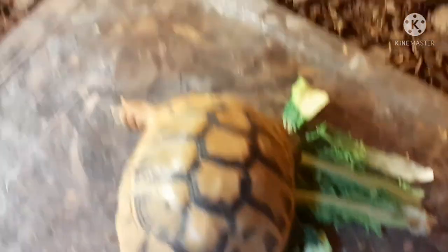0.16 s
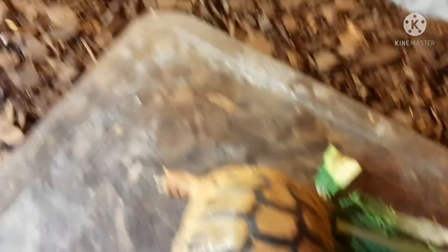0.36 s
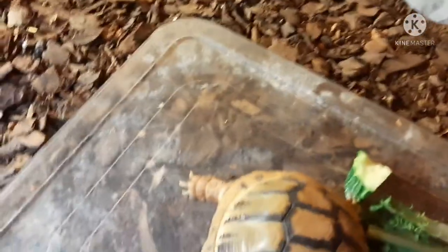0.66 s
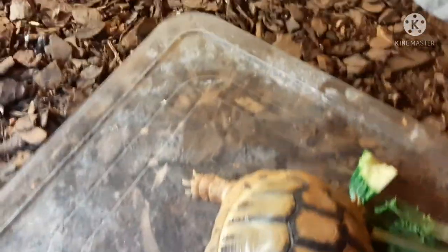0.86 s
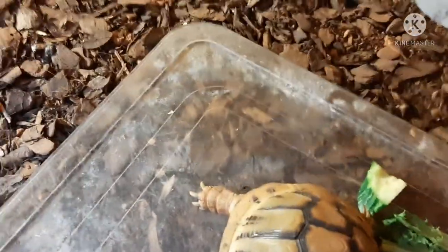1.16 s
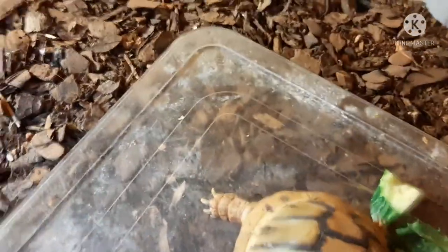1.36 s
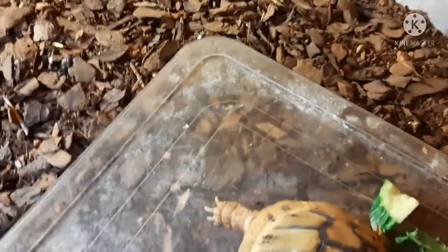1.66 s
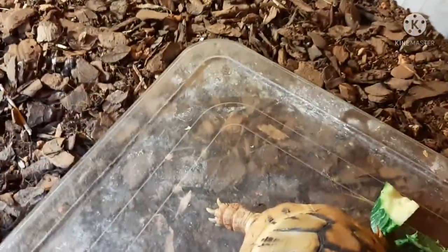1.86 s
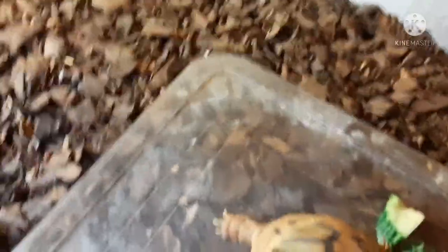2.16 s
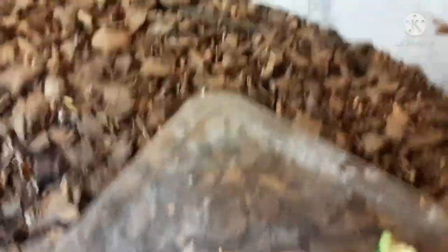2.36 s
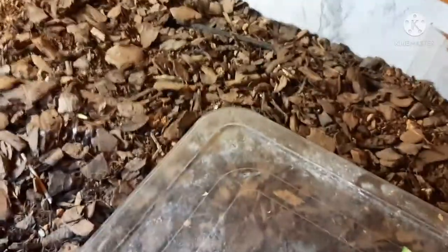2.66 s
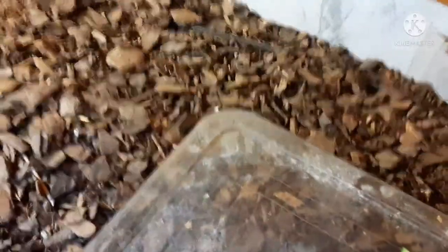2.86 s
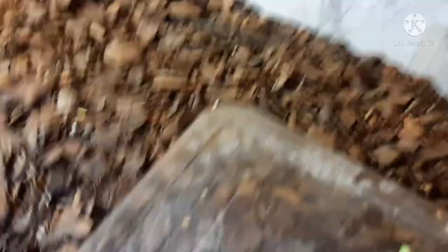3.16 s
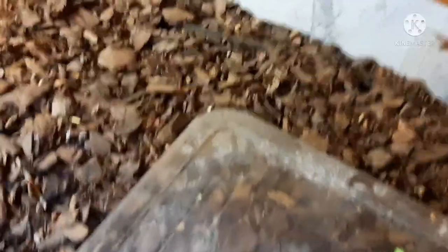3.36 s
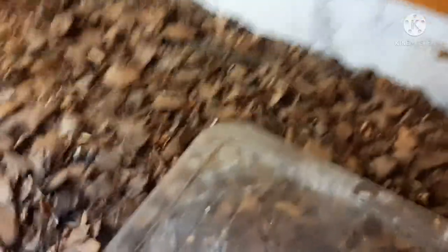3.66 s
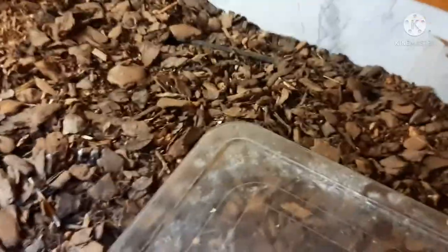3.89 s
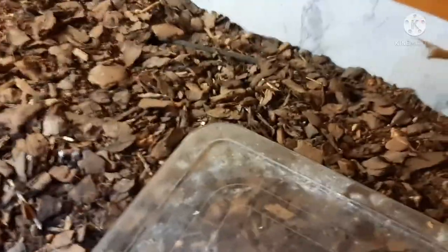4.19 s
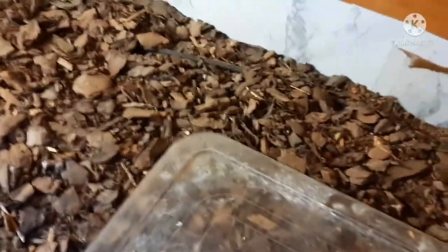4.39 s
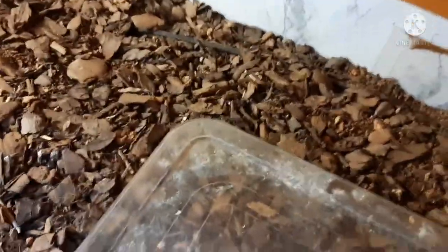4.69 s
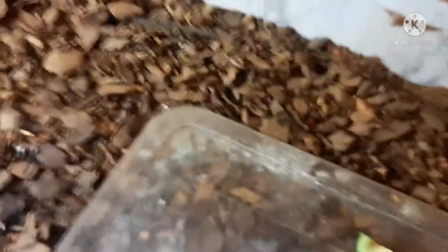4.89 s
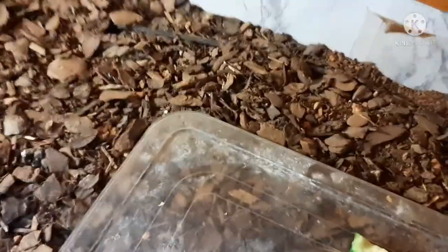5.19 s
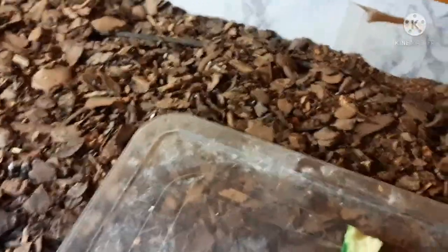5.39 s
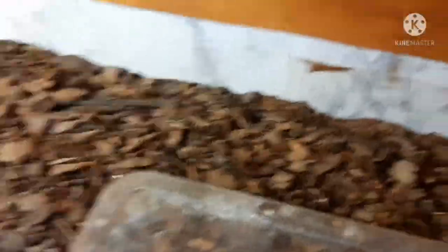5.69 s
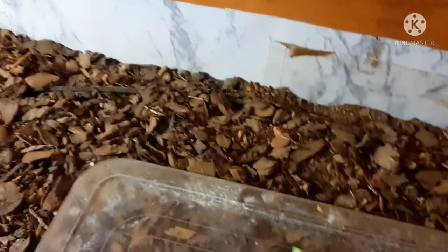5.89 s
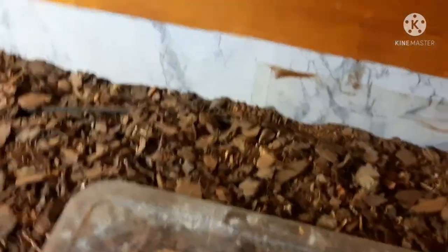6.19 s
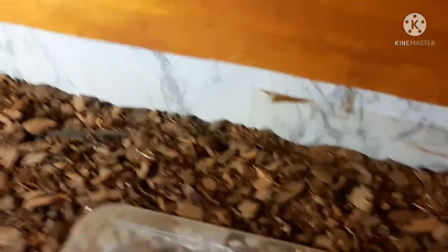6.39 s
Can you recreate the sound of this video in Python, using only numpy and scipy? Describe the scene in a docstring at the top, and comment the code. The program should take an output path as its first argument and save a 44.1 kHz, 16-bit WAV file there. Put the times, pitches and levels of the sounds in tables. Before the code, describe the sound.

In a small indoor pen, a tortoise moves on a plastic tray close to a handheld microphone. A dull handling bump opens, then soft footfalls and thin claw scratches are broken by a few sharp, dry plastic clicks, loudest past the middle. Near the end the shell slides briefly over the tray. Low handling rumble gradually settles over a steady machine hum and soft room noise.

```python
"""First a dull double bump and rumble: a hand on a phone. Then, close by, a tortoise shifts about on a
hard plastic tray lying on bark chips in a small indoor pen. Its claws snap off the plastic and the shell
lands just after, in quick double knocks; between them come light steps and faint stick-slip scratching.
Each contact excites the tray's modes and the pen walls scatter it. Behind: room air and a machine's hum."""
import sys
import numpy as np
from scipy import signal
from scipy.fft import rfft, irfft, next_fast_len
from scipy.io import wavfile
from scipy.ndimage import uniform_filter1d

SR = 44100
rng = np.random.default_rng(int(sys.argv[2]) if len(sys.argv) > 2 else 0)


def materialize(psi):
    """Save the field psi as 16-bit PCM at rate SR to the path in sys.argv[1].

    A 1-D psi becomes a single channel; in a 2-D psi each row is a channel.
    """
    bounded = np.clip(np.atleast_2d(psi).T, -1, 1)
    quanta = np.round(bounded * 32767).astype(np.int16)
    wavfile.write(sys.argv[1], SR, quanta)


N = 288414
TIME_S = np.arange(N) / SR
HIT_TIME_S = np.arange(SR // 2) / SR
LEFT_RIGHT = np.array([[1], [-1]])

# Claw snaps, shell landings: t/s, level/dB, treble at 10 kHz/dB, body under 1.3 kHz/dB, claw spot f/Hz,
# thud level/dB, landing delay/s, landing re snap/dB, landing spot f/Hz
SNAPS = [(1.4673, -17, 9, -0.5, 1864, -25.5, .0047, -5, 7600),
         (3.845, -10, 1.5, -3, 2300, -24, .0102, 1, 3430),
         (4.124, -26, -12, -5, 1500, -40, 0.0079, 4, 3660),
         (4.8529, -10, -0.5, -16.5, 1464, -26.5, .0085, 6, 3250),
         (5.2476, -9.5, -19, -9, 2750, -31, .0068, 7.5, 1280)]
# Footfalls: t/s, level/dB, treble at 10 kHz/dB, spot f/Hz, thud level/dB, thud f/Hz, skid length/s
STEPS = [(0.8786, -51.5, 2, 8000, -37.5, 386, 0.055), (1.1768, -54, 2, 7800, -41, 220, .032),
         (1.4382, -55.5, 4, 6000, -42, 300, .022), (1.505, -29, -5, 3500, -44, 379, 0.004),
         (1.6184, -61, 4.5, 12000, -68, 250.7, 0.011), (2.0802, -43.5, -7.5, 1950, -30.5, 318, 0.012),
         (2.3458, -51.5, -9.5, 2500, -43, 358, 0.028), (2.6099, -44, 9.5, 996, -28.5, 346, 0.0024),
         (2.912, -50, -11, 1955, -39.5, 402, 0.017), (3.231, -54, -4.5, 8200, -55.5, 293, 0.015),
         (3.2665, -49, -3, 8420, -41.5, 221, 0.026), (3.7552, -56.5, -3, 7990, -54.5, 280, 0),
         (5.2188, -49, -15, 7200, -63.5, 230, 0.0015), (5.682, -47.5, 5.5, 1270, -42.5, 383, 0),
         (5.8193, -26, -37, 1390, -41.5, 390, 0.0046)]
# Claw drags: t/s, length/s, level/dB, treble at 10 kHz/dB
SCRAPES = [(0.584, 0.31, -73, -0.5), (1.647, 0.1, -70.5, 5.5), (2.418, 0.039, -62.5, 8.5),
           (2.787, 0.15, -69.5, 14), (3.536, 0.31, -68, 3), (5.615, 0.18, -49.5, -6),
           (5.774, 0.26, -68, -1)]
# Soft rubs, first hand on phone, then shell on tray: t/s, length/s, level/dB, treble at 10 kHz/dB
RUBS = [(0.201, 0.24, -60, -36), (1.43, 0.024, -37.5, -102), (2.583, 0.029, -47, -89),
        (2.93, 0.17, -54, -95), (3.26, 0.15, -52.5, -94.5), (3.786, 0.057, -42, -98.5),
        (5.588, 0.084, -50.5, -16), (5.631, 0.06, -39, -11), (5.698, 0.077, -43, -4)]
# Hollow resonances of the rubs: f/Hz, width/Hz, level/dB
RUB_MODES = [(260, 57, -5), (370.8, 110, -2.5), (617.6, 53, -3.5), (1080, 120, -2.5), (1264, 150, -0.5),
             (1776, 230, -15.5), (2290, 110, -5), (2620, 72, -9), (5000, 160, -14.5)]
# Tray floor flexing, damped by the bark: f/Hz, level/dB, t60/s
FLOOR_MODES = [(82, -3, 1), (127, -6, 0.29), (170, -2, 0.12), (233, -2.5, 0.076), (318.4, -1, 0.089),
               (382, 3.5, 0.06), (448, -6.5, 0.1), (629.7, -7, 0.085)]
# Thin ring after the hardest landing: f/Hz, level/dB, t60/s
AFTER_RING_MODES = [(2930, -50, .4), (3030, -51, 0.36), (5375, -66, 0.48)]
# Stiff resonances of tray walls and rim: f/Hz, width/Hz, gain/dB
RIM_MODES = [(1210, 160, 0), (1900, 320, 3), (2455, 77, 6.5), (2870, 110, 5.5), (3020, 24, 7),
             (3356, 42, 4), (3480, 55, 4.5), (4100, 43, 4), (4590, 56, 5.5), (5480, 45, 6.5),
             (5760, 500, -7.5), (6560, 84, 5), (7050, 60, 3), (8070, 600, 4), (9374, 600, -4.5),
             (10700, 300, 2), (12700, 240, 4)]
# Broad colour of the plastic: f/Hz, gain/dB
PLASTIC_SPECTRUM = [(100, -16.5), (300, -13.5), (850, 4), (1400, 2.5), (3000, -1.5), (4500, 0.83),
                    (6000, 1.5), (10000, 0.5), (14000, 0), (16000, -23.5)]
# Hand bumps on the phone: t/s, level/dB
BUMPS = [(0.058, -22.5), (0.0707, -21)]
# Phone case modes: f/Hz, level/dB, t60/s
CASE_MODES = [(185.8, -5.5, 0.21), (258, 0, 0.11), (427, -9, 0.17), (471.5, -17, 0.22), (649, -13, 0.23),
              (749, -7, 0.12), (1050, -17, 0.15), (1150, -17, 0.057)]
# Skin on the case: f/Hz, relative level/dB
SCUFF_SPECTRUM = [(200, -26), (600, -20), (1100, 1), (1600, -8), (2600, -8), (3300, -26), (8000, -23),
                  (15000, -23)]
# Hand rumble: f/Hz, relative level/dB
RUMBLE_SPECTRUM = [(12, -29), (28, -26.5), (40, 7), (52, 15.5), (66, 7.5), (90, -12), (115, -7.5),
                   (250, -62)]
# Brief shifts of the grip: t/s, level/dB
GRIP_SHIFTS = [(0.01, -26.5), (1.36, -35.5), (1.88, -36), (3.0, -40.5), (3.48, -41.5), (4.68, -53)]
# Room air: f/Hz, relative level/dB
AIR_SPECTRUM = [(20, -18), (100, 1), (160, 0), (300, -8), (450, -10.5), (620, -10.5), (800, -17),
                (1020, -11.5), (1500, -23), (2500, -33), (5500, -42.5), (8000, -38), (15000, -38)]
# Room air as the phone turns: t/s, level/dB
AIR_LEVELS = [(0, -47), (0.3, -54), (1.2, -54), (2.2, -55.5), (3.2, -54), (4.5, -57.5), (5.3, -56),
              (6.54, -53)]
# Two beating motors and overtones: f/Hz, rms level/dB
HUM_TONES = [(79.8, -45), (87, -47), (159.6, -60.5), (306, -68.5), (598, -70)]


def snaps(give_lead_s=0.0021, give_db=-23, catch_db=-6, catch_hz=3060, thud_hz=397, after_ring_at_s=4.8615):
    """A loaded claw gives, snaps off and catches again; the blunt shell lands, duller. One landing rings."""
    out = np.zeros((2, N))
    for at_s, db, treble_db, body_db, claw_hz, thud_db, drop_s, landing_db, landing_hz in SNAPS:
        add(out, at_s - give_lead_s, knock(db + give_db, treble_db, body_db, claw_hz))
        add(out, at_s, knock(db, treble_db, body_db, claw_hz) + thud(thud_db, thud_hz))
        add(out, at_s + 0.42 * drop_s, knock(db + catch_db, treble_db, body_db, catch_hz))
        landing = knock(db + landing_db, treble_db - 4, body_db, landing_hz)
        add(out, at_s + drop_s, landing + thud(thud_db + 1, thud_hz))
    add(out, after_ring_at_s, ring(AFTER_RING_MODES, spread_rad=0.7, jitter=0.0019))
    return out


def steps(body_db=2, skid_delay_s=0.0081, skid_db=-2):
    """A foot ticks and thuds on the tray; mostly its claw skids on."""
    out = np.zeros((2, N))
    for at_s, db, treble_db, spot_hz, thud_db, thud_hz, skid_s in STEPS:
        add(out, at_s, knock(db, treble_db, body_db, spot_hz) + thud(thud_db, thud_hz))
        if skid_s > 0:
            add(out, at_s + skid_delay_s, scratch(skid_s, db + skid_db, treble_db))
    return out


def knock(db, treble_db, body_db, spot_hz, spot_lift_db=7.5, body_hz=1300):
    """A contact cracks on the plastic and lifts the resonance of its spot."""
    def gain_db(hz):
        spot_db = spot_lift_db * bell(hz, spot_hz, 0.21 * spot_hz)
        panel_db = body_db / (1 + (hz / body_hz) ** 6)  # blows near the rim hardly bend the panels
        return plastic_db(hz) + tilt_db(hz, treble_db) + spot_db + panel_db
    return undb(db) * colour(scatter(), gain_db)


def thud(db, favoured_hz, width_hz=280):
    """The tray floor flexes under load; the place of contact picks the modes."""
    modes = [(hz, mode_db + 10 * np.log10(bell(hz, favoured_hz, width_hz)), t60_s)
             for hz, mode_db, t60_s in FLOOR_MODES]
    return undb(db) * ring(modes, spread_rad=0.9, jitter=0.051)


def scatter(crack_db=4, spiky_db=4, tail_db=-23):
    """Contact response: spiky crack, dense short-lived tray modes, duller tail from the pen walls."""
    size = len(HIT_TIME_S)
    spikes = unit_rms(stereo_noise(size, side_db=-1) * undb(spiky_db * rng.standard_normal(size)))
    crack = undb(crack_db) * decay(t60_s=0.0072) * spikes
    tray = decay(t60_s=0.075) * stereo_noise(size, side_db=0)
    tail = undb(tail_db) * decay(t60_s=0.23) * stereo_noise(size, side_db=-0.5)
    return crack + tray + colour(tail, lambda hz: tilt_db(hz, treble_db=-3))


def plastic_db(hz):
    """Tray response: broad colour plus wall and rim resonances."""
    rim_db = sum(db * bell(hz, centre_hz, width_hz) for centre_hz, width_hz, db in RIM_MODES)
    return spectrum_db(PLASTIC_SPECTRUM, hz) + rim_db


def ring(modes, spread_rad, jitter):
    """Damped modes of one blow, randomly detuned; each reaches the two ports at its own phase."""
    out = 0
    for hz, db, t60_s in modes:
        detune, lag = rng.standard_normal(2)
        phase_rad = 2 * np.pi * hz * (1 + jitter * detune) * HIT_TIME_S
        out = out + undb(db) * decay(t60_s) * np.sin(phase_rad + spread_rad * lag * LEFT_RIGHT)
    attack = 1 - decay(t60_s=0.0049)
    return out * attack


def scrapes():
    """Claws drag over the tray between steps."""
    out = np.zeros((2, N))
    for at_s, length_s, db, treble_db in SCRAPES:
        add(out, at_s, scratch(length_s, db, treble_db))
    return out


def scratch(length_s, db, treble_db, tip_hz=10500, tip_width_hz=3000, tip_db=3):
    """A sharp claw tip sticks and slips: a high, grainy hiss."""
    def gain_db(hz):
        hiss_db = tip_db * (2 * bell(hz, tip_hz, tip_width_hz) - 1)
        return plastic_db(hz) + tilt_db(hz, treble_db) + hiss_db
    return undb(db) * colour(stick_slip(length_s, slips_per_s=1100, uneven_db=5), gain_db)


def rubs():
    """Soft rubs: first a faint hand rub on the phone, then the shell sliding on the tray."""
    out = np.zeros((2, N))
    for at_s, length_s, db, treble_db in RUBS:
        def gain_db(hz):
            power = sum(undb(mode_db) ** 2 * bell(hz, centre_hz, width_hz)
                        for centre_hz, width_hz, mode_db in RUB_MODES)
            return 10 * np.log10(power / power.mean()) + tilt_db(hz, treble_db)
        judder = stick_slip(length_s, slips_per_s=500, uneven_db=3.5)
        add(out, at_s, undb(db) * colour(judder, gain_db))
    return out


def stick_slip(length_s, slips_per_s, uneven_db):
    """A tapered run of tiny uneven slips, each smeared by the contact response."""
    count = int(np.clip(length_s * SR, 2, SR))
    slipping = rng.random(SR) < slips_per_s / SR
    slips = slipping * undb(uneven_db * rng.standard_normal(SR))
    run = unit_rms(slips[:count] + 1e-9) * signal.windows.tukey(count, 0.53)
    response = scatter()
    response /= np.sqrt(np.sum(response ** 2) / 2)
    return signal.fftconvolve(run[None], response, axes=1)


def bumps(scuff_db=-24):
    """The hand knocks dully on the phone case and scuffs over it."""
    out = np.zeros((2, N))
    for at_s, db in BUMPS:
        skin = shaped_noise(SCUFF_SPECTRUM, len(HIT_TIME_S), side_db=0)
        scuff = undb(scuff_db) * skin * decay(t60_s=0.15)
        case = ring(CASE_MODES, spread_rad=0.6, jitter=0.0043)
        add(out, at_s, undb(db) * (case + scuff))
    return out


def rumble(evenness=0.34):
    """The hand shakes both ports nearly alike, with a fairly even swing."""
    shake = shaped_noise(RUMBLE_SPECTRUM, N, side_db=-24.5)
    swing = np.sqrt(uniform_filter1d(np.mean(shake ** 2, axis=0), size=2200))
    return unit_rms(shake / swing ** evenness) * grip()


def grip(start_db=-36.5, settled_db=-47.5, settle_s=2.0, shift_half_s=0.085):
    """Rumble gain: the hand steadies slowly, with a swell at each shift."""
    resting = undb(settled_db + (start_db - settled_db) * np.exp(-TIME_S / settle_s))
    swell_power = sum(undb(db) ** 2 * np.exp(-((TIME_S - at_s) / shift_half_s) ** 2)
                      for at_s, db in GRIP_SHIFTS)
    return np.sqrt(resting ** 2 + swell_power)


def machine_hum(wander_rad=0.19):
    """Two motors beat; each tone wanders slightly in phase."""
    hum = 0
    for hz, db in HUM_TONES:
        phase_rad = 2 * np.pi * (hz * TIME_S + rng.random()) + wander_rad * drift(points=20)
        hum = hum + np.sqrt(2) * undb(db) * np.sin(phase_rad)
    return hum


def room_air(swell_db=-0.7, left_db=1.3):
    """Dull, gently swelling room noise, louder on the left."""
    air = shaped_noise(AIR_SPECTRUM, N, side_db=-1)
    level_db = np.interp(TIME_S, *np.transpose(AIR_LEVELS))
    return air * undb(level_db + swell_db * drift(points=60) + left_db * LEFT_RIGHT)


def undb(db):
    return 10 ** (np.asarray(db) / 20)


def unit_rms(x):
    return x / np.sqrt(np.mean(x ** 2))


def decay(t60_s):
    return np.exp(-np.log(1000) * HIT_TIME_S / t60_s)


def bell(hz, centre_hz, width_hz):
    """Resonance power curve, peak 1."""
    return 1 / (1 + (2 * (hz - centre_hz) / width_hz) ** 2)


def tilt_db(hz, treble_db):
    """Linear in frequency, treble_db at 10 kHz; softer contacts lose treble."""
    return treble_db * hz / 10000


def spectrum_db(points, hz):
    """Interpolate (f/Hz, level/dB) rows over log frequency."""
    points_hz, db = np.transpose(points)
    return np.interp(np.log(hz + 1), np.log(points_hz), db)


def colour(x, gain_db):
    """Minimum-phase filter with response gain_db(hz)."""
    size = 2 * next_fast_len(x.shape[-1] // 2 + 4096)
    hz = np.arange(size // 2 + 1) * SR / size
    cepstrum = irfft(np.log(undb(gain_db(hz))))
    cepstrum[1:size // 2] *= 2
    cepstrum[size // 2 + 1:] = 0
    return irfft(rfft(x, size) * np.exp(rfft(cepstrum)), size)[..., :x.shape[-1]]


def stereo_noise(size, side_db):
    """White mid/side noise, rms 1."""
    mid, side = rng.standard_normal((2, size))
    return unit_rms(mid + undb(side_db) * side * LEFT_RIGHT)


def shaped_noise(points, size, side_db):
    """Stereo noise with the given spectrum, rms 1."""
    return unit_rms(colour(stereo_noise(size, side_db), lambda hz: spectrum_db(points, hz)))


def drift(points):
    """Slow line through random points."""
    return np.interp(TIME_S, np.linspace(0, TIME_S[-1], points), rng.standard_normal(points))


def add(out, at_s, x):
    start = max(int(at_s * SR), 0)
    out[:, start:start + x.shape[-1]] += x[..., :max(N - start, 0)]


def scene():
    """Tortoise, hand and room at the two microphone ports."""
    return snaps() + steps() + scrapes() + rubs() + bumps() + rumble() + room_air() + machine_hum()


def record(dry, notch_hz=825, notch_width_hz=170, notch_db=-11, top_hz=15800):
    """Microphone: hollow mids, clipped peaks, steep top cut."""
    hollow = colour(dry, lambda hz: notch_db * bell(hz, notch_hz, notch_width_hz))
    lowpass = signal.ellip(10, 0.2, 80, top_hz, fs=SR, output="sos")
    return signal.sosfilt(lowpass, np.clip(hollow, -0.9, 0.9))


dry = scene()
out = record(dry)
materialize(out)
```